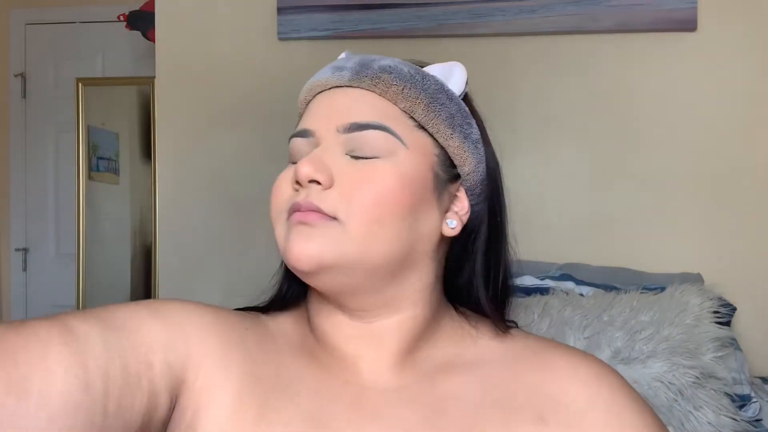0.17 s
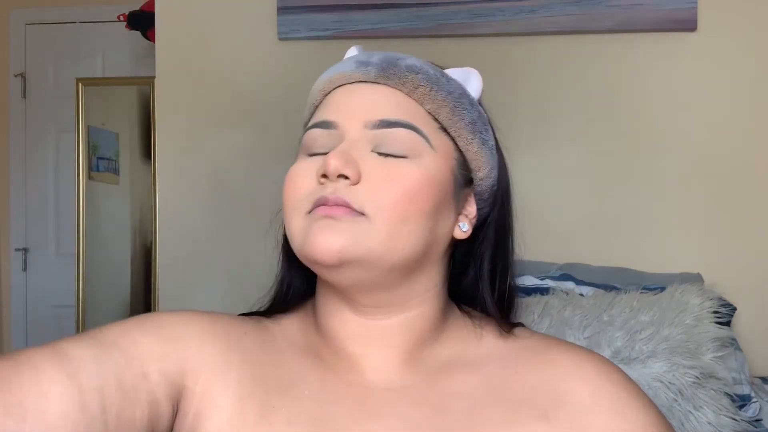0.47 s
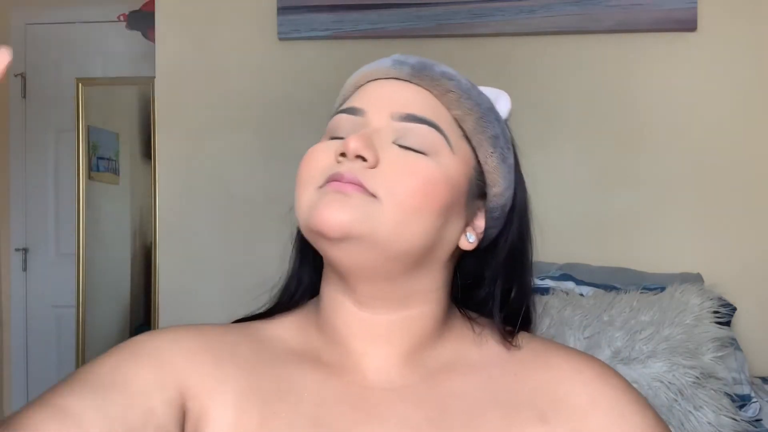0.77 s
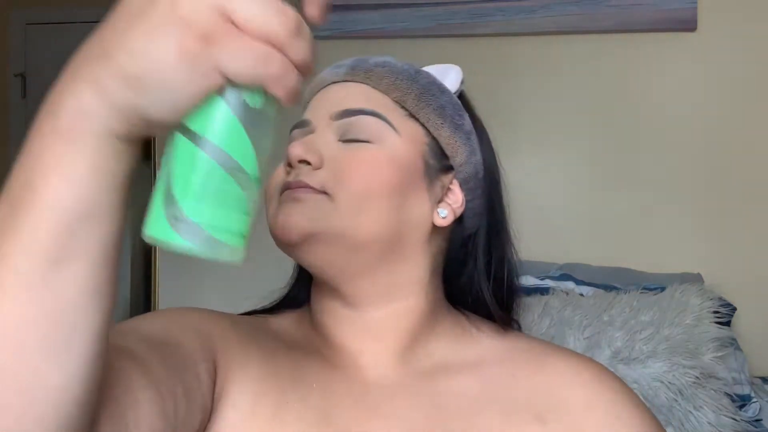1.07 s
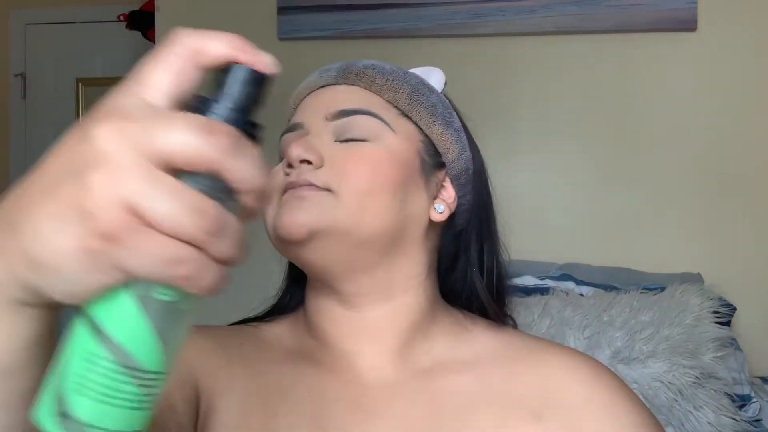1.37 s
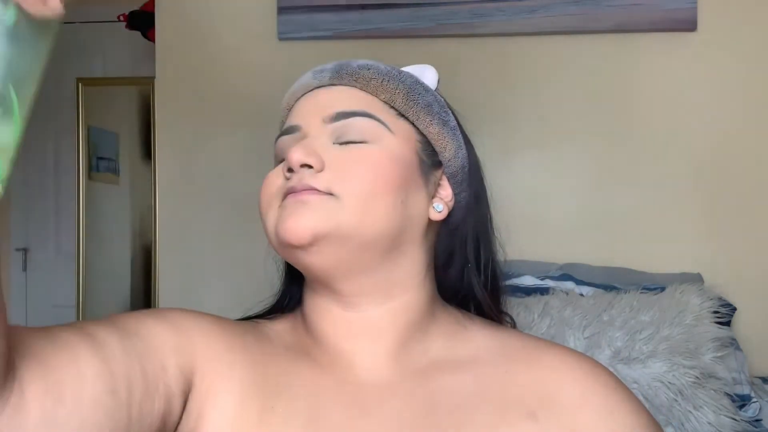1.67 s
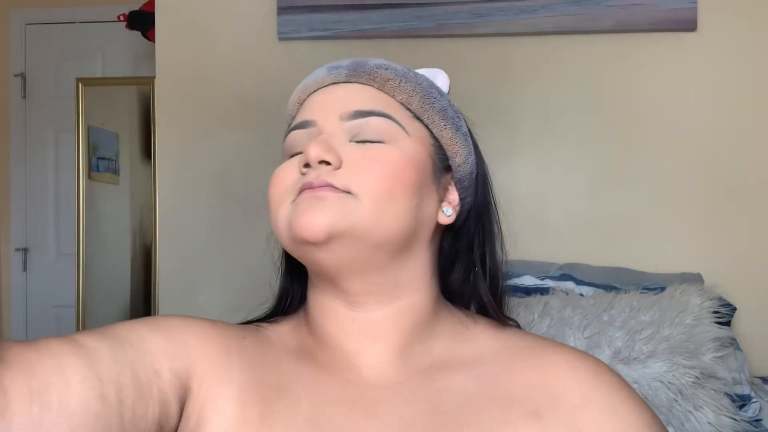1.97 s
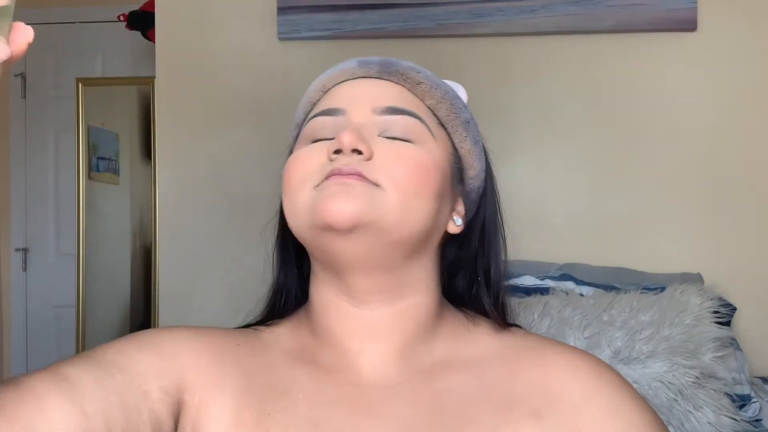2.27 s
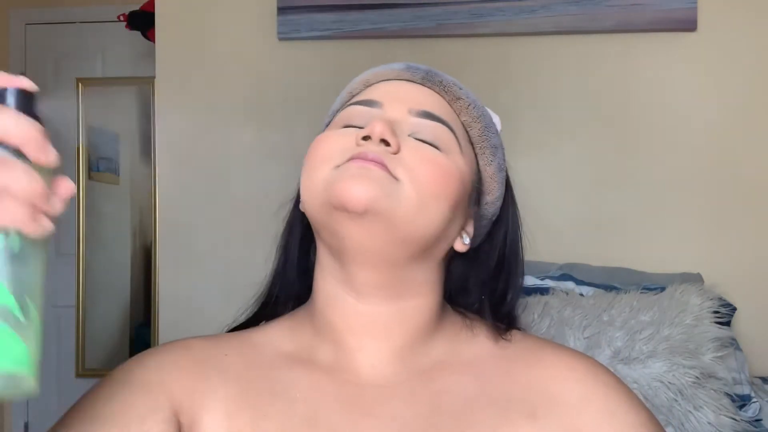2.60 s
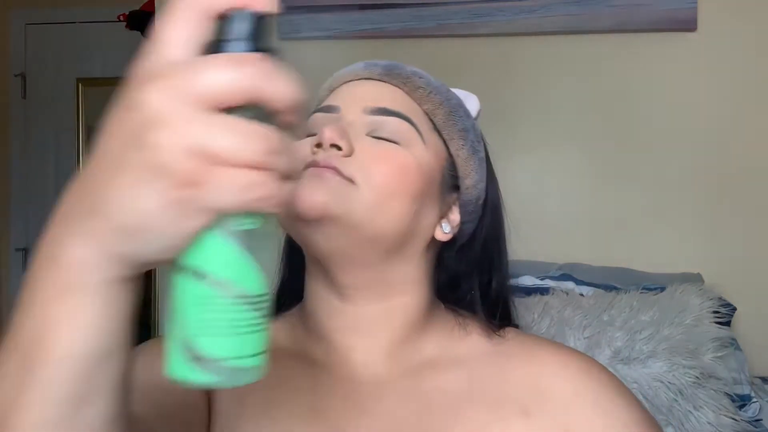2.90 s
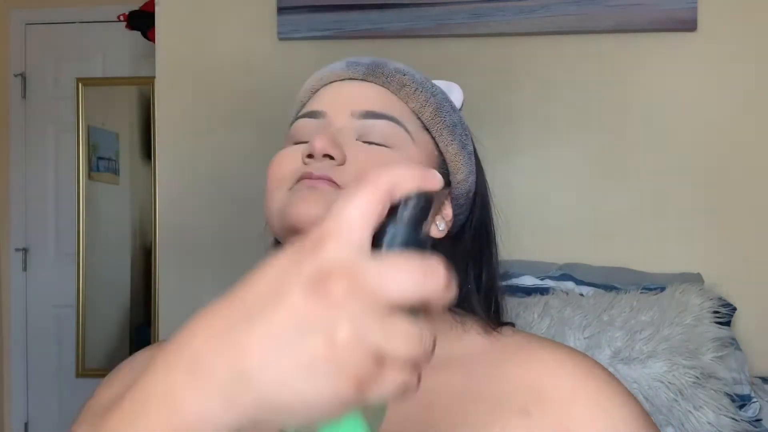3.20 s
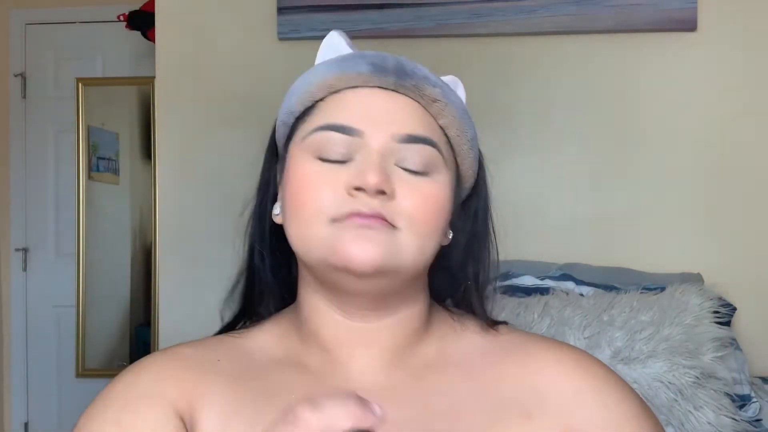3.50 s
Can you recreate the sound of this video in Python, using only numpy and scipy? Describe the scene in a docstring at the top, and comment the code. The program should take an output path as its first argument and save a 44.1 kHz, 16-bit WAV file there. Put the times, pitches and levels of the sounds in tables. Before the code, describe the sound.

Fast spray bottle strokes, about four per second, clack and hiss close to a phone in a small room; a brief gap breaks the hissing around the middle, then softer pumps continue until near the end.

```python
"""Quick hollow clacks and short hisses: a finger works the pump of a small mist bottle about four times a second.
It is near a phone in a quiet bedroom. The plunger stutters down and snaps back: each jolt is a sine note of the
hollow plastic bottle plus a noise rap ringing the shell. Valve and spring tick as short bright noise.
Each stroke sends a hiss of shaped noise through the nozzle. The room answers with soft noise tails,
over a low wavering rumble, a beating hum and faint air."""
import sys
import numpy as np
from scipy import signal
from scipy.fft import rfft, irfft, next_fast_len
from scipy.io import wavfile
from scipy.ndimage import uniform_filter1d

SR = 44100
rng = np.random.default_rng(int(sys.argv[2]) if len(sys.argv) > 2 else 0)


def materialize(psi):
    """Save the field psi as 16-bit PCM at rate SR to the path in sys.argv[1].

    A 1-D psi becomes a single channel; in a 2-D psi each row is a channel.
    """
    bounded = np.clip(np.atleast_2d(psi).T, -1, 1)
    quanta = np.round(bounded * 32767).astype(np.int16)
    wavfile.write(sys.argv[1], SR, quanta)


N = 160965  # length in samples

# Plunger jolts. Each row: start in seconds, strength in dB, bottle pitch it settles to in Hz,
# shell rap over the bottle note in dB, time for the note to fall 60 dB in seconds (raised to 0.01 if shorter).
PLUNGER_JOLTS = [(0.109, -35, 627, -7.5, 0.018), (0.301, -11, 649, -7, 0.024),
                 (0.509, -12.5, 663, -4.5, 0.027), (0.738, -20, 710, -7.5, 0.035),
                 (0.79, -26.5, 725, 0, 0.009), (0.804, -24.5, 760, -3, 0.015),
                 (0.95, -13.5, 692, -9, 0.038), (1.006, -23, 610, -0.5, 0.0083),
                 (1.019, -31.5, 696, 9, 0.023), (1.169, -38, 676, -9, 0.01),
                 (1.236, -22.5, 660, 1.5, 0.017), (1.249, -37.5, 625, -3.5, 0.037),
                 (1.397, -17.5, 679, -9, 0.047), (1.447, -34.5, 616, -5, 0.021),
                 (1.46, -25.5, 688, 1.5, 0.021), (1.622, -45.5, 708, 0.5, 0.064),
                 (1.684, -30.5, 662, -8, 0.015), (1.697, -34, 720, 8, 0.04), (1.873, -24, 672, -6.5, 0.037),
                 (1.919, -33, 720, 0, 0.016), (1.932, -28.5, 610, 3, 0.017), (2.109, -46, 690, -14, 0.023),
                 (2.144, -39, 645, -8, 0.011), (2.163, -20.5, 646, -4, 0.012),
                 (2.176, -26.5, 720, 4, 0.027), (2.336, -41, 742, -7, 0.062), (2.392, -35, 723, 0.5, 0.021),
                 (2.405, -29.5, 650, -6.5, 0.016), (2.417, -42.5, 613, 10.5, 0.04),
                 (2.589, -41, 733, -6.5, 0.065), (2.628, -36, 740, -2, 0.037),
                 (2.644, -25.5, 745, -5, 0.01), (2.659, -37.5, 625, 10.5, 0.081),
                 (2.876, -33.5, 723, 1, 0.014), (2.889, -30.5, 675, 2, 0.02), (2.904, -35, 630, -24, 0.015),
                 (3.056, -44.5, 760, -8, 0.023), (3.069, -45, 693, -37, 0.028),
                 (3.127, -21.5, 683, -6.5, 0.011), (3.139, -34, 630, -3, 0.021),
                 (3.303, -47.5, 766, -4, 0.027), (3.32, -41.5, 755, -28, 0.0099),
                 (3.368, -23, 703, -6, 0.0053), (3.637, -56, 860, 7, 0.038)]
# Short bright ticks of valve and spring. Each row: start in seconds, strength in dB.
VALVE_TICKS = [(0.2176, -27), (0.299, -33), (0.389, -34), (0.5078, -33.5), (0.597, -32), (0.736, -35),
               (0.764, -37.5), (0.79, -35), (0.814, -28.5), (0.9498, -30.5), (1.0046, -33), (1.0176, -30.5),
               (1.2339, -27.5), (1.3924, -37.5), (1.44, -40), (1.6345, -39), (1.6963, -42.5),
               (1.8685, -37.5), (1.931, -44), (2.1603, -43), (2.175, -29), (2.3452, -45.5), (2.4045, -44.5),
               (2.5854, -45), (2.601, -45.5), (2.643, -41.5), (2.67, -48), (2.829, -46), (2.866, -36.5),
               (2.8874, -38), (3.125, -42), (3.367, -50)]
# Sprays. Each row: start in seconds, strength in dB, length before the release in seconds, treble lift in dB.
SPRAYS = [(0.0014, -60.5, 0.07, 6), (0.152, -38.5, 0.071, 7), (0.38, -37, 0.06, 5.5),
          (0.592, -37, 0.056, 8), (0.807, -38, 0.062, 4.5), (1.016, -36, 0.06, 3), (1.48, -33.5, 0.051, 4),
          (1.726, -32.5, 0.042, 4), (1.951, -34, 0.05, 5), (2.18, -36, 0.042, 5.5),
          (2.425, -37.5, 0.053, 8), (2.657, -38, 0.061, 4.5), (2.915, -31.5, 0.043, 1.5),
          (3.159, -36, 0.03, 4), (3.359, -54.5, 0.031, -1.5)]
# Tone of the nozzle hiss. Each row: frequency in Hz, relative level per Hz in dB.
NOZZLE_TONE = [(300, -11.5), (600, -5.5), (1300, -1), (2900, -1.5), (5000, -3), (8000, -8.5), (15000, -9)]
# Ringing modes of the plastic shell. Each row: frequency in Hz, width in Hz, relative level in dB.
SHELL_MODES = [(1027, 320, 3.5), (1590, 278, 8), (1836, 830, 2)]
# Higher mode, woken more by hard jolts. Each row: frequency in Hz, width in Hz, relative level in dB.
CAP_MODES = [(2534, 700, -1.1)]
# Room echo. Each row: frequency in Hz, time to fall 60 dB in seconds, relative level in dB.
ROOM_ECHO = [(312, 0.55, -7.5), (670, 0.14, -0.5), (1390, 0.28, 0), (2840, 0.23, 1), (7900, 0.34, -7.5),
             (15300, 0.22, -10)]
# Tone of the house rumble. Each row: frequency in Hz, relative level per Hz in dB.
RUMBLE_TONE = [(24, 7.5), (32, -7), (45, -5), (100, -3.5), (180, -9), (240, -18.5), (330, -32),
               (600, -46.5)]
# Tone of the room air. Each row: frequency in Hz, relative level per Hz in dB.
AIR_TONE = [(200, -10.5), (400, -6.5), (840, -9), (2200, -27), (5000, -65), (15000, -54)]
# Likeness of left and right in diffuse sound. Each row: frequency in Hz, likeness (1 = same, 0 = unrelated).
LEFT_RIGHT_LIKENESS = [(50, 0.99), (300, 0.89), (1000, 0.51), (2500, 0.067), (5000, 0.35), (7000, 1)]

# Jolts
RISE_S, SOFTER_RISE, FIRM_DB = 0.0021, 0.14, -19.5  # rise at the firm strength; weaker jolts rise slower
SHARP_START, SETTLE_S = 0.6, 0.001  # the note starts 60% sharp
SCRAPE_S, SCRAPE_DB = 0.006, -18  # the scrape swells up to the contact
SHELL_LEAD_S, NOTE_DB, SHELL_DB = 0.001097, -6, -2.5
CAP_GROWS = 0.4  # extra dB of cap per dB of jolt
SOFT_HZ = 2810  # soft contact dulls the shell above about here
# Ticks
TICK_T60_S, TICK_LOW_HZ = 0.013, 4000
# Sprays
ATTACK_S, TREBLE_ATTACK_S, RELEASE_T60_S = 0.0047, 0.003, 0.05
JET_DB, SWELL_DB, SPUTTER_DB, TREBLE_HZ = -9.5, 2.5, 2.5, 8100
# Room and background
ROOM_JOLT_DB, ROOM_SPRAY_DB = -10.5, -5
RUMBLE_DB, WAVER_DB, AIR_DB = -51, 1.43, -68
HUM_DB, HUM_HZ, BEAT_HZ, BEAT_PEAK_S = -56.5, 58.7, 1.93, 0.28
# Recording
LAG_S, LAG_FROM_HZ = 1 / 3040, 4100
TOP_HZ, WEAK_FROM_HZ, WEAK_DB = 16650, 15750, -24


def amp(db):
    """Turn decibels into a plain multiplier."""
    return 10 ** (np.asarray(db) / 20)


def unit(x):
    """Scale a signal to an average (RMS) level of 1."""
    return x / np.sqrt(np.mean(x ** 2) + 1e-20)


def along(points, hz, column=1):
    """Read one column of a table between its frequencies, on a log scale."""
    columns = np.transpose(points)
    return np.interp(np.log(hz + 1), np.log(columns[0] + 1), columns[column])


def filtered(x, response):
    """Multiply the spectrum of x by a response that depends on frequency."""
    size = next_fast_len(x.shape[-1] + 8192)
    spectrum = rfft(x, size) * response(np.fft.rfftfreq(size, 1 / SR))
    return irfft(spectrum, size)[..., :x.shape[-1]]


def modes(table):
    """Response of several resonances, added with alternating sign."""
    def response(f):
        total = 0
        for k, (center, width, db) in enumerate(table):
            resonance = 1j * f * width / (center * center - f * f + 1j * f * width)
            total = total + (-1) ** k * amp(db) * resonance
        return total
    return response


def spread(pair):
    """Mix two unrelated signals until left and right are as alike as the likeness table says."""
    def mid_side(hz):
        turn = np.arccos(np.clip(along(LEFT_RIGHT_LIKENESS, hz), -1, 1)) / 2
        return np.array([np.cos(turn), np.sin(turn)])
    mid, side = filtered(pair, mid_side)
    return np.array([mid + side, mid - side])


def shaped_hiss(points):
    """Stereo noise with the tone of a table, at average level 1."""
    noise = rng.standard_normal((2, N))
    return unit(spread(filtered(noise, lambda f: amp(along(points, f)))))


def add(track, s, piece):
    """Mix piece into track at s seconds."""
    part = track[max(round(s * SR), 0):][:len(piece)]
    part += piece[:len(part)]


def bottle_note(hz, t60, rise):
    """The bottle's hollow note swells, starts sharp and settles while it dies away; its peak is 1."""
    t = np.arange(SR // 5) / SR
    turns = t + SHARP_START * SETTLE_S * (1 - np.exp(-t / SETTLE_S))
    envelope = amp(-60 * t / max(t60, 0.01)) * (1 - np.exp(-t / rise)) ** 2
    ring = envelope * np.sin(2 * np.pi * hz * turns)
    return ring / abs(ring).max()


def shell_rap(t, rise):
    """A noise burst of total energy 1: a growing scrape before contact at t = 0, then a quick knock."""
    scrape = amp(SCRAPE_DB) * np.exp(t / SCRAPE_S)
    knock = np.tanh(amp(SCRAPE_DB) + 2 * t / rise) * np.exp(-0.5 * t / rise)
    rap = rng.standard_normal(len(t)) * np.where(t < 0, scrape, knock)
    return rap / np.linalg.norm(rap)


def jolts():
    """Each jolt swings up the bottle's note and raps the shell; harder ones wake more of the cap mode."""
    notes, raps, cap_raps = np.zeros(N), np.zeros(N), np.zeros(N)
    rap_t = (np.arange(1000) - 600) / SR
    for s, db, hz, shell_db, t60 in PLUNGER_JOLTS:
        rise = RISE_S * amp(-SOFTER_RISE * (db - FIRM_DB))
        add(notes, s, amp(db + NOTE_DB) * bottle_note(hz, t60, rise))
        # 24.5 dB makes up for the rap being scaled by its whole energy
        rap = amp(db + shell_db + SHELL_DB + 24.5) * shell_rap(rap_t, rise)
        rap_start = s - SHELL_LEAD_S + rap_t[0]
        add(raps, rap_start, rap)
        add(cap_raps, rap_start, amp(CAP_GROWS * (db + 16.5)) * rap)
    shell = filtered(raps, modes(SHELL_MODES)) - filtered(cap_raps, modes(CAP_MODES))
    soft_contact = lambda f: 1 / (1 + 1.2j * f / SOFT_HZ - (f / SOFT_HZ) ** 2) ** 2
    return notes + filtered(shell, soft_contact)


def sprays():
    """Nozzle hiss, wide in the middle band: quick opening, arched pressure, fast release."""
    t, low, high = np.arange(SR // 4) / SR, np.zeros(N), np.zeros(N)
    for s, db, length, lift_db in SPRAYS:
        arch_db = SWELL_DB * np.sin(np.pi * np.clip(t / length, 0, 1))
        release_db = -60 * np.maximum(t - length, 0) / RELEASE_T60_S
        pressure_db = db + JET_DB + arch_db + release_db
        add(low, s, (1 - np.exp(-t / ATTACK_S)) ** 2 * amp(pressure_db))
        add(high, s, (1 - np.exp(-t / TREBLE_ATTACK_S)) ** 2 * amp(pressure_db + lift_db))
    # The low and treble parts of the hiss flutter separately
    flutter = unit(uniform_filter1d(rng.standard_normal((2, N)), size=300))
    sputter = amp(SPUTTER_DB * flutter)
    jet = shaped_hiss(NOZZLE_TONE)
    treble = filtered(jet, lambda f: 1 / (1 + (TREBLE_HZ / (f + 1)) ** 6))
    return sputter[0] * low * (jet - treble) + sputter[1] * high * treble


def ticks():
    """Valve and spring make very short, bright cracks of fading noise."""
    out, t = np.zeros(N), np.arange(800) / SR
    for s, db in VALVE_TICKS:
        envelope = amp(db - 60 * t / TICK_T60_S) * np.minimum(t / 0.0002, 1)
        add(out, s, envelope * rng.standard_normal(len(t)))
    return filtered(out, lambda f: (1j * f / (TICK_LOW_HZ + 1j * f)) ** 3)


def room_tail():
    """Half a second of noise in which each pitch dies away at its own pace, as echoes in a room do."""
    hz, t, noise = signal.stft(rng.standard_normal((2, SR // 2)), SR, nperseg=256)
    start_db = along(ROOM_ECHO, hz, column=2)[:, None]
    fall_db = 60 * t / along(ROOM_ECHO, hz)[:, None]
    tail = spread(signal.istft(noise * amp(start_db - fall_db), SR, nperseg=256)[1])
    return tail / np.linalg.norm(tail[0])


def room(x):
    """The room's diffuse answer: each fifth of a second of sound gets a newly drawn tail."""
    out, step = np.zeros((2, N + SR)), SR // 5
    for i in range(0, N, step):
        wet = signal.fftconvolve(x[None, i:i + step], room_tail(), axes=1)
        out[:, i + 250:][:, :wet.shape[1]] += wet  # the answer comes 250 samples late
    return out[:, :N]


def rumble():
    """Low house rumble: deep noise whose level wavers."""
    waver = amp(WAVER_DB * unit(uniform_filter1d(rng.standard_normal(N), size=2500)))
    return amp(RUMBLE_DB) * waver * shaped_hiss(RUMBLE_TONE)


def hum():
    """Two near-equal motor tones beat: a sine times a slow cosine is the same as their sum."""
    t = np.arange(N) / SR
    beating = np.sin(2 * np.pi * HUM_HZ * t) * np.cos(np.pi * BEAT_HZ * (t - BEAT_PEAK_S))
    return amp(HUM_DB) * unit(beating)


def room_air():
    """Faint, steady noise of the room air."""
    return amp(AIR_DB) * shaped_hiss(AIR_TONE)


def scene():
    """Mix pump, mist and ticks, each slightly stronger on the right, with the room and background."""
    pump, mist, valve = jolts(), sprays(), ticks()
    wet = room(amp(ROOM_JOLT_DB) * pump + amp(ROOM_SPRAY_DB) * (mist.mean(0) + valve))
    direct = pump * amp([[-0.3], [0.3]]) + (mist + valve) * amp([[-0.6], [0.6]])
    return direct + wet + rumble() + hum() + room_air()


def record(dry):
    """The right channel's treble lags; the sound is much weaker above 15750 Hz and absent above 16650 Hz."""
    def recording(f):
        half_turn = np.pi * LAG_S * np.maximum(f - LAG_FROM_HZ, 0)
        lag = np.exp(1j * half_turn * np.array([[1], [-1]]))  # left moves ahead, right falls behind
        return lag * amp(WEAK_DB * (f > WEAK_FROM_HZ)) * (f < TOP_HZ)
    return filtered(dry, recording)


dry = scene()
out = record(dry)
materialize(out)
```